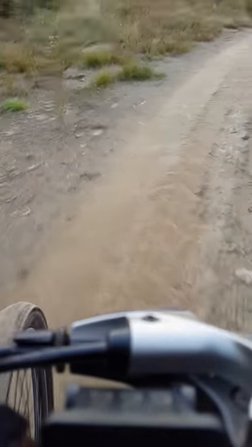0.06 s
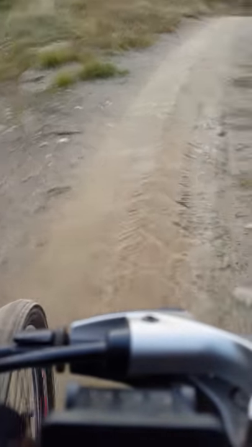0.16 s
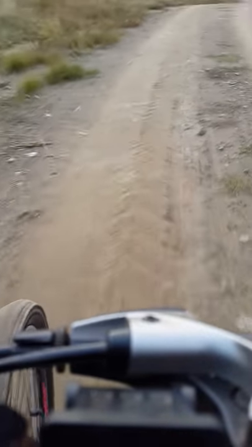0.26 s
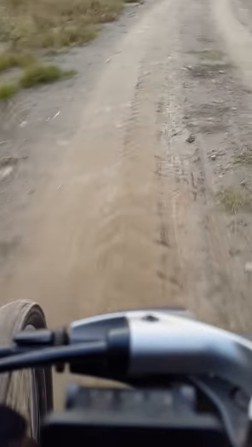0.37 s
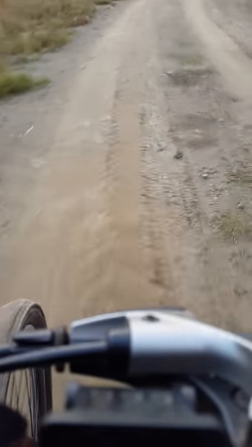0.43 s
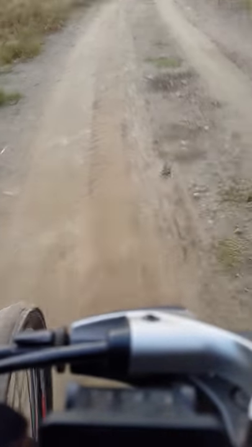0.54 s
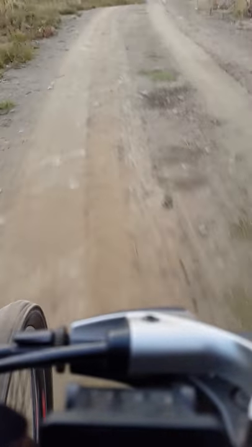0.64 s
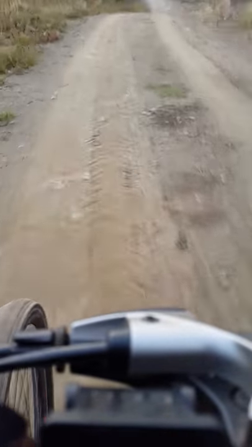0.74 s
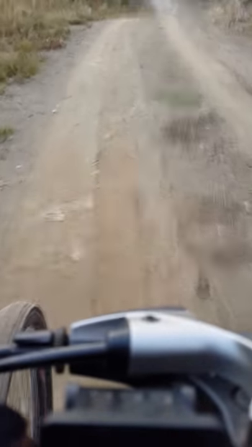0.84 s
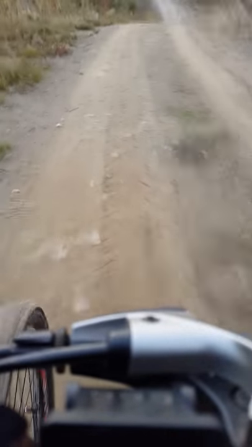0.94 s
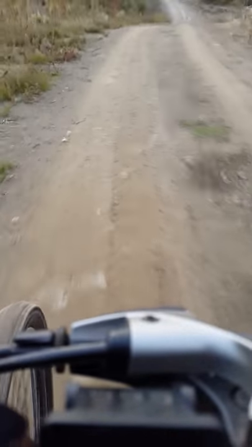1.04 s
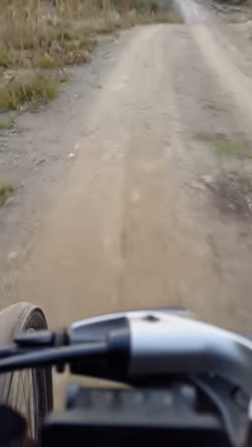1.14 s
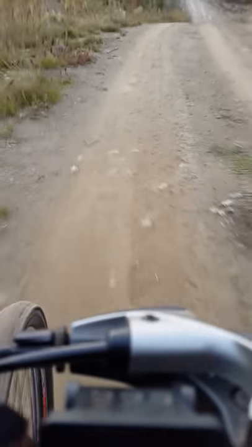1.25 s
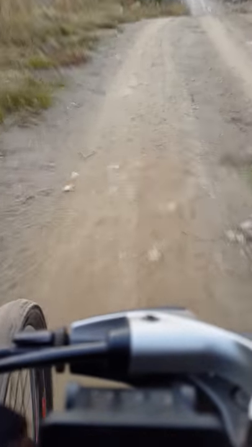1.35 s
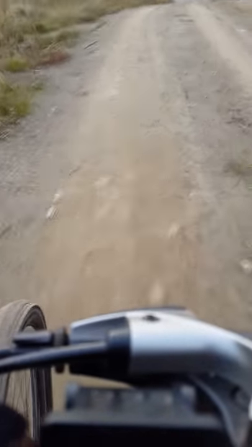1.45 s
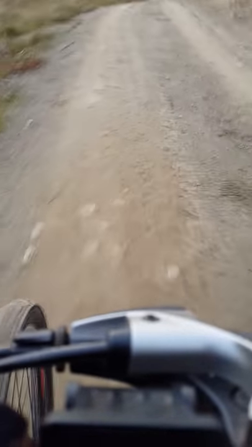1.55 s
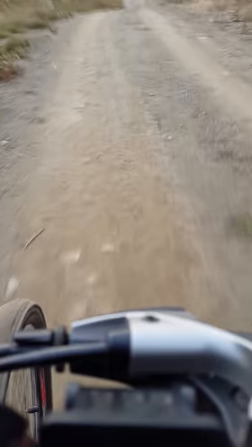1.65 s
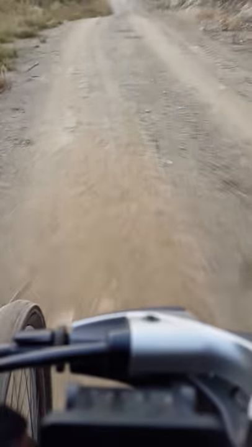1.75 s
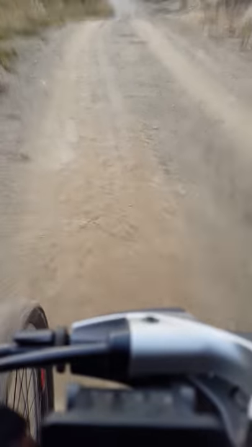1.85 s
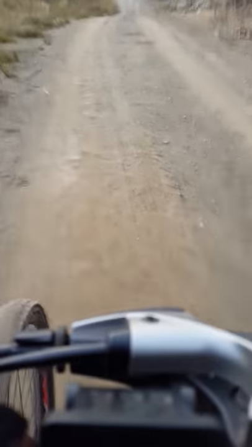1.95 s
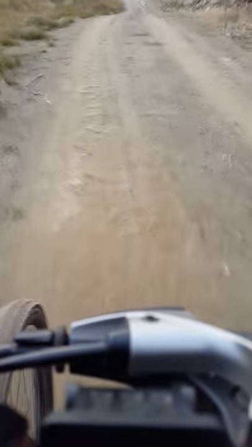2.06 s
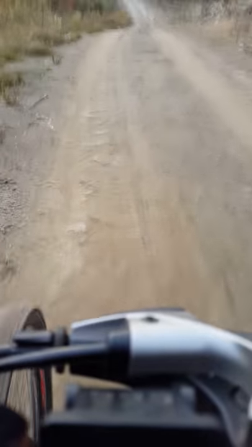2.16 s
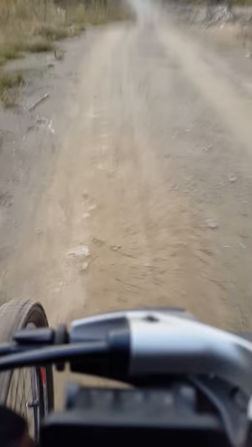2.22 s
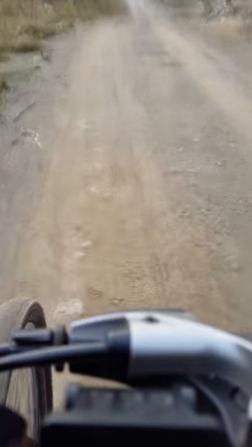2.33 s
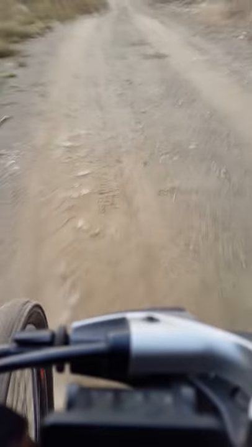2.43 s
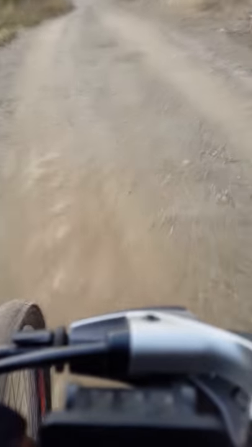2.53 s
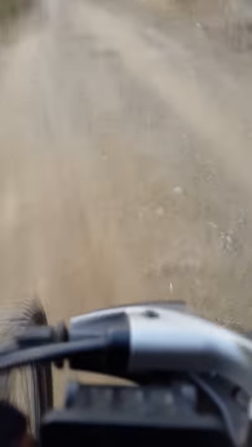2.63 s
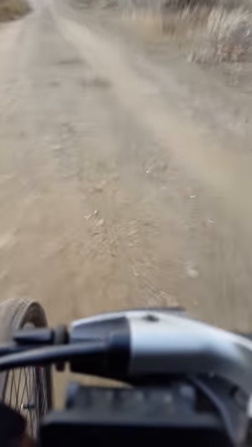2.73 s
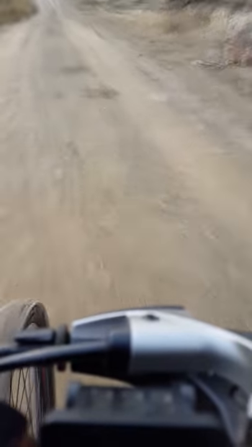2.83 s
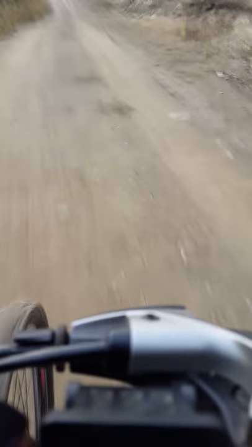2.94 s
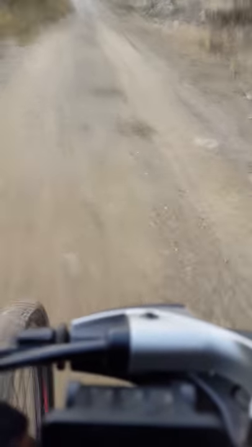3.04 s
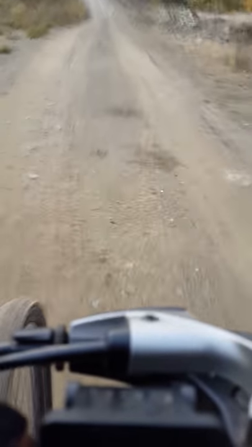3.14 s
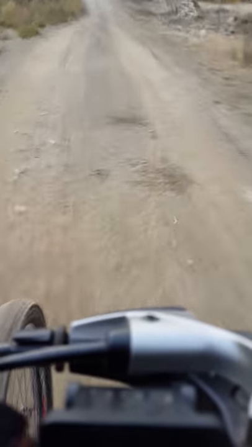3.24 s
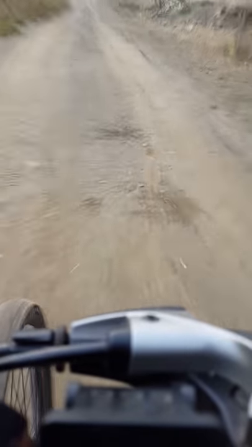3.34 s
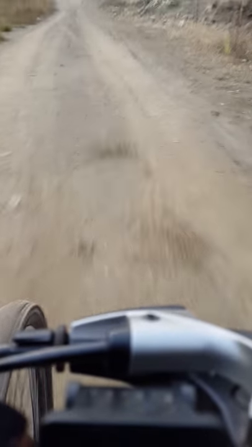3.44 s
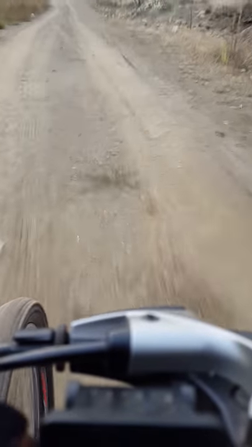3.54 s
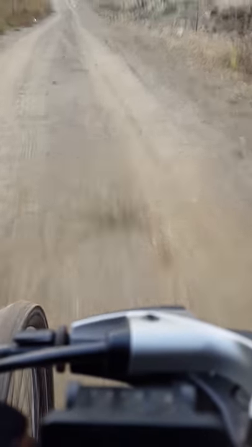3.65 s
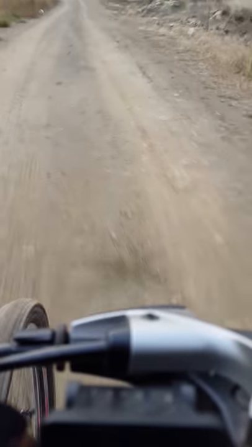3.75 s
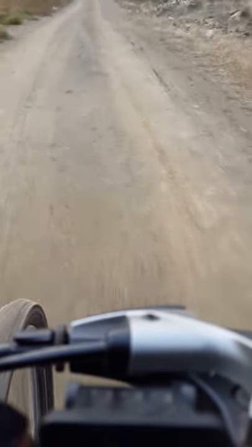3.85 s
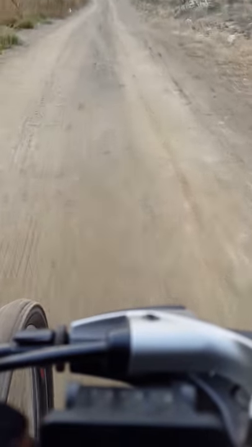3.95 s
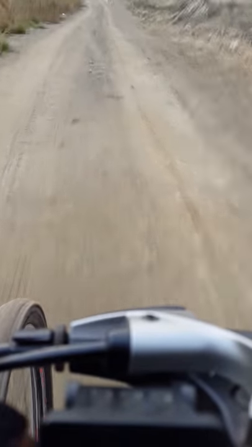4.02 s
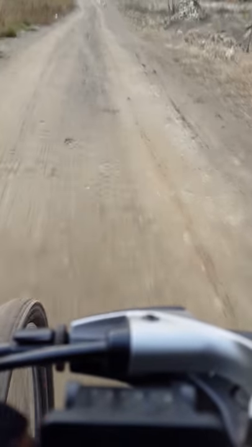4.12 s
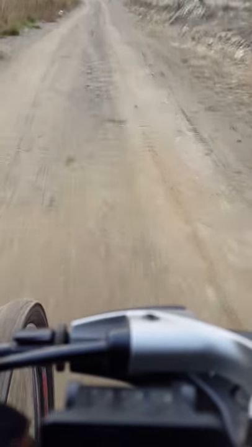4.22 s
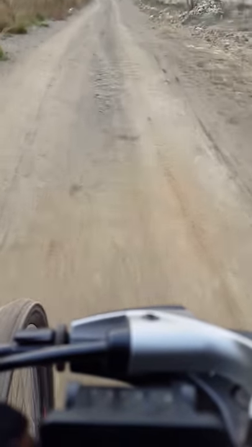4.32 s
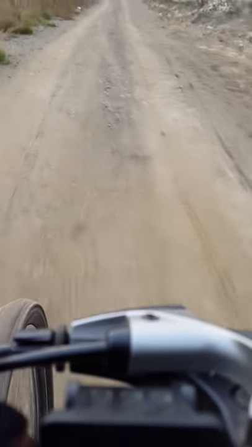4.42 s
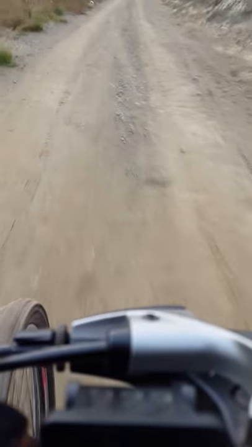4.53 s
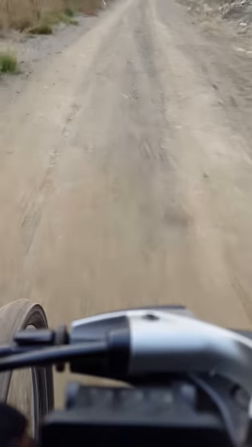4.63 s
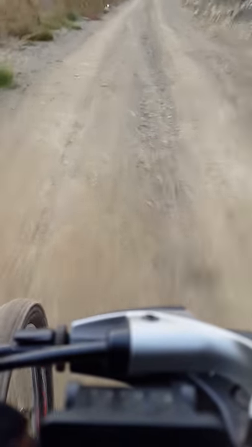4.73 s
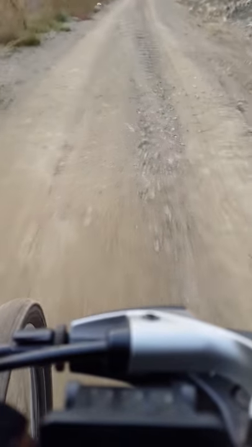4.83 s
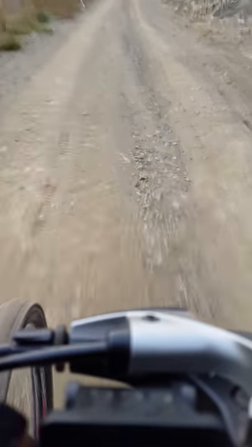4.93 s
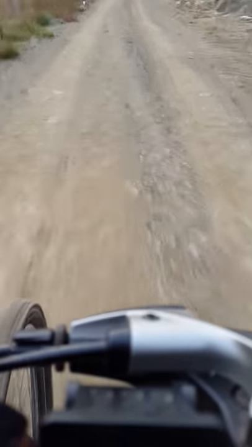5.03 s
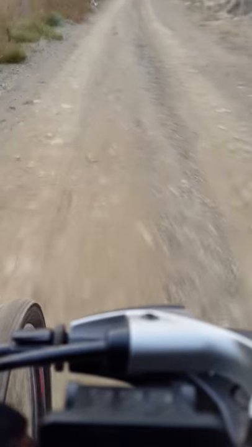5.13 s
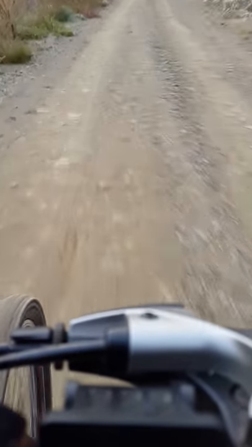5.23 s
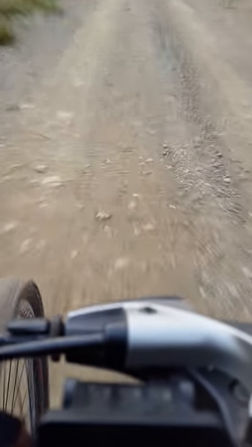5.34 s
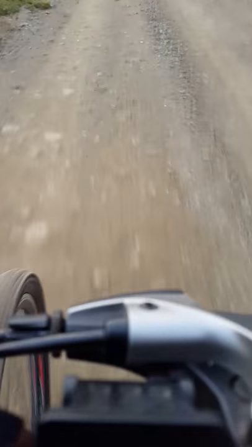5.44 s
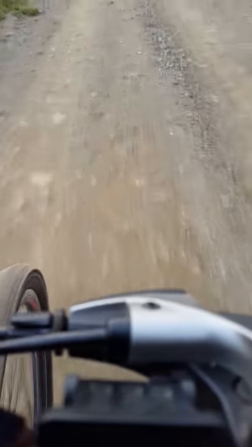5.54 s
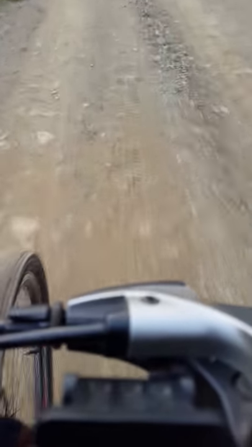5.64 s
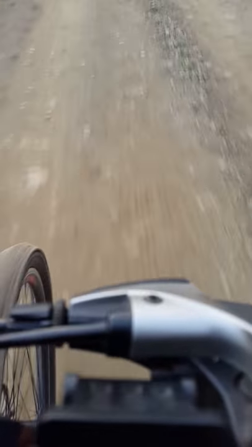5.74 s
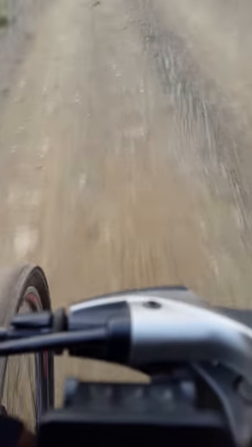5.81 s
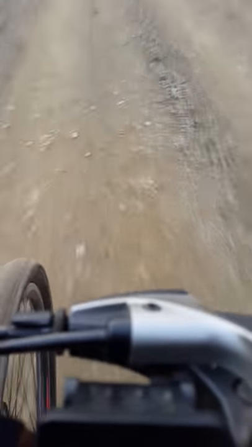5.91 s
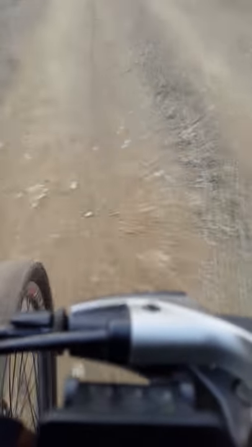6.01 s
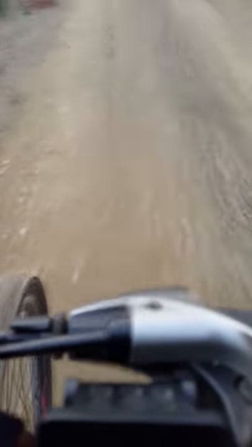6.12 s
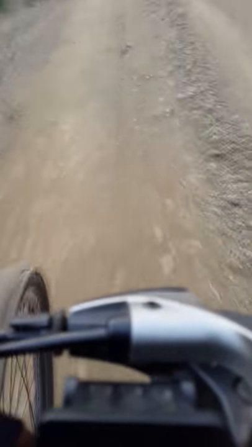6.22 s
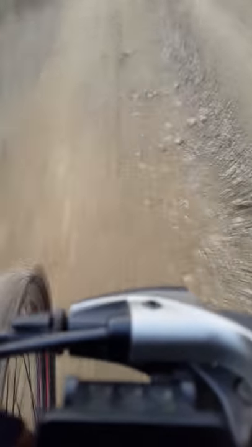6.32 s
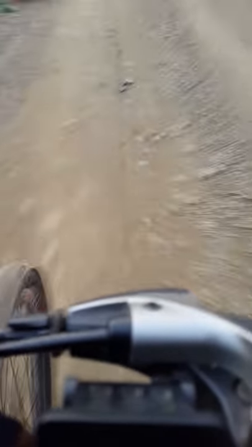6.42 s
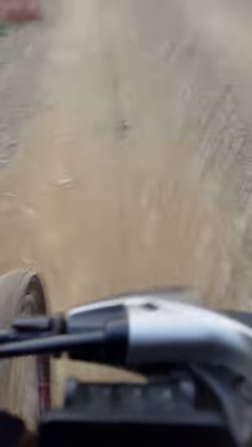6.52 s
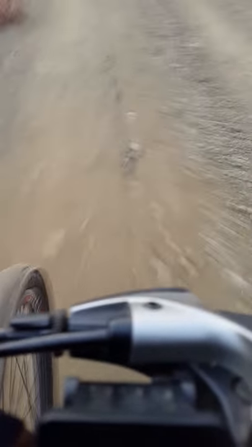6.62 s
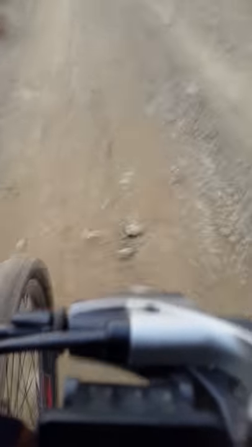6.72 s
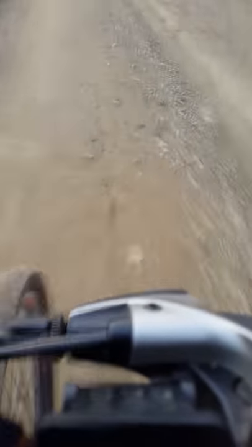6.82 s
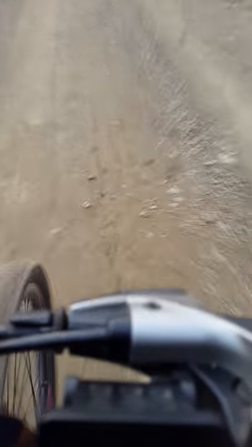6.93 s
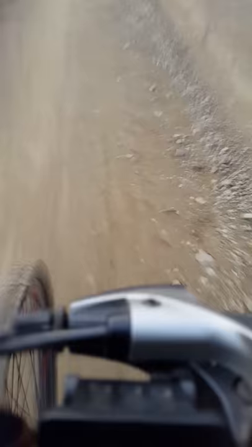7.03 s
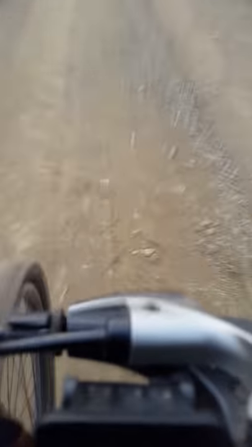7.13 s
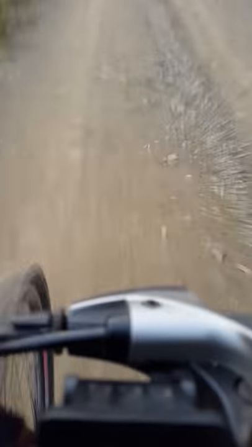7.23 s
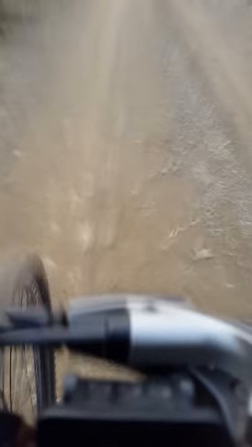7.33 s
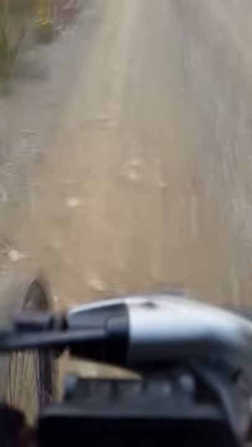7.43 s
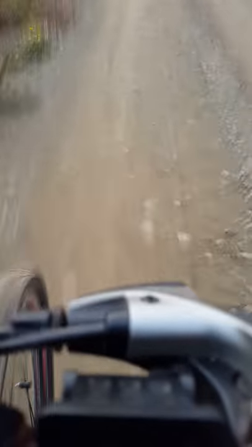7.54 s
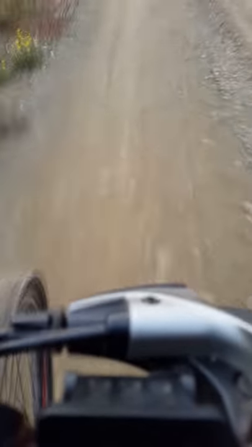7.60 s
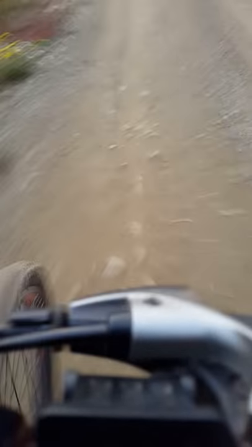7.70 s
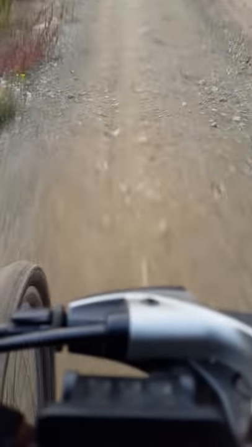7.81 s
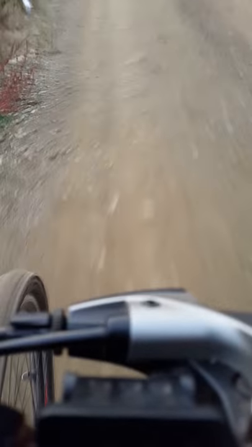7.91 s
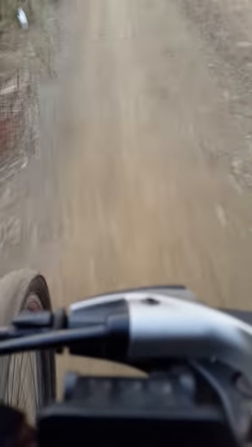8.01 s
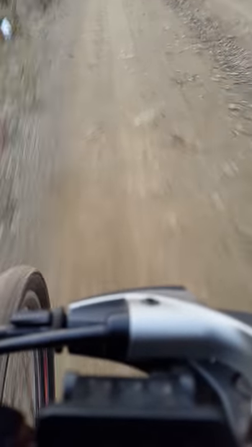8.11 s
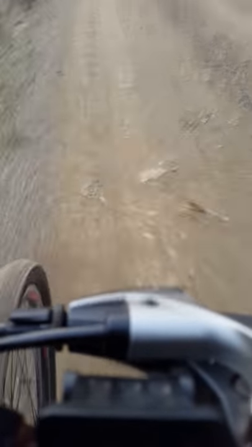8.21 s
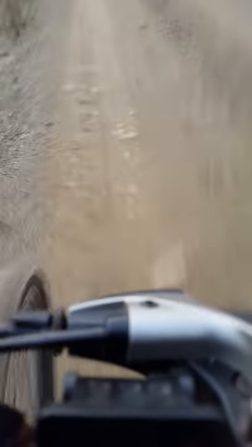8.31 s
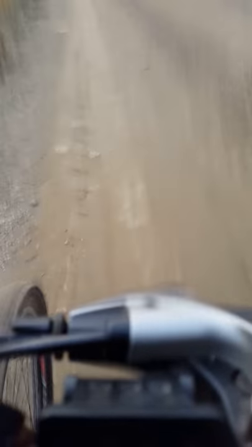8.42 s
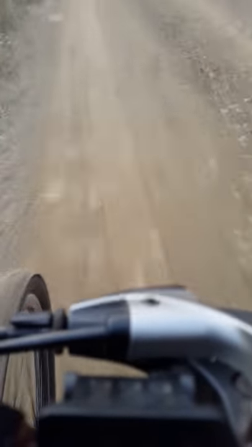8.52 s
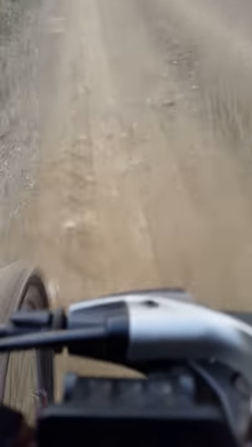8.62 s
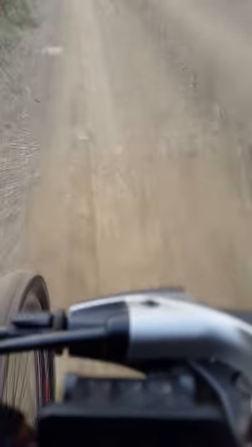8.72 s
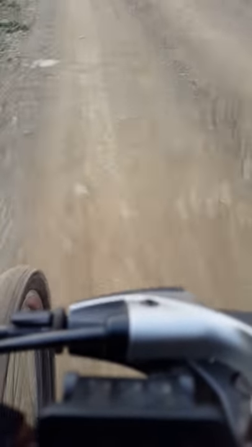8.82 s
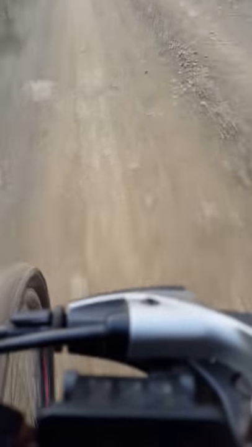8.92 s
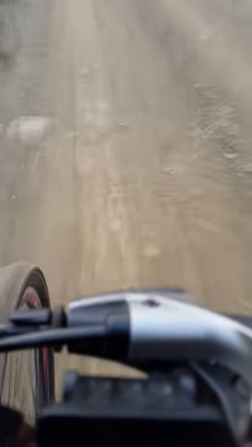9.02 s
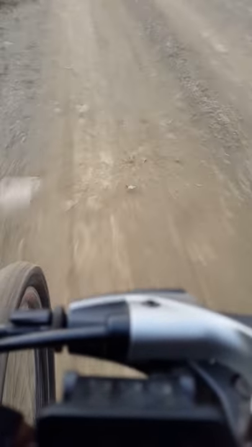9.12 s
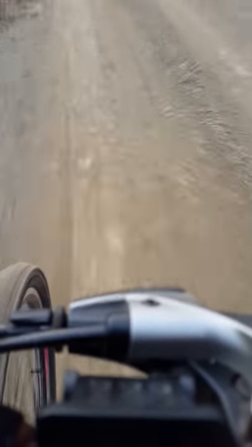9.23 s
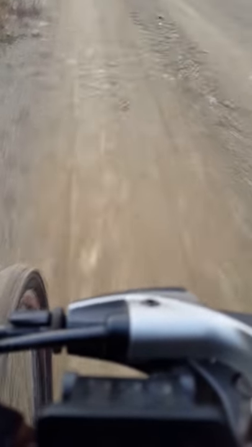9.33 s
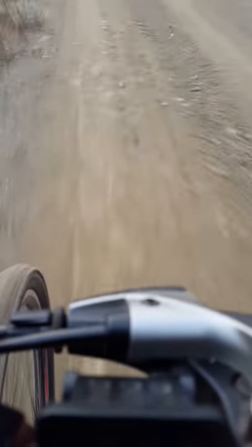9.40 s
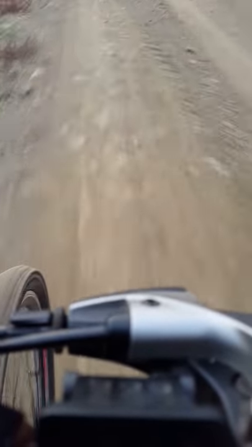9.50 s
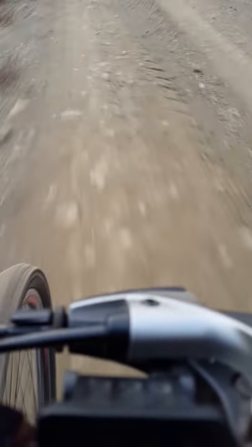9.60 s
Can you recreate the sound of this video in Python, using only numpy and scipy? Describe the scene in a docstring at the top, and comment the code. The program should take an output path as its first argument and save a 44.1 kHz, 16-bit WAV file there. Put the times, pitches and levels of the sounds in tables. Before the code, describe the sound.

A mountain bike rolls down a gritty track, its tyre rumble, knocks and cable clatter mixing with a growing, gusty wind roar.

```python
"""A puff of wind and a few light knocks, then a growing roar: a mountain bike gathers speed down a
dirt track, heard from its handlebar. Turbulent air buffets two microphone ports over the rumble of
the tyres, which crunch and hiss on grit. Bumps excite the damped modes of fork and frame, loose
cables and chain clack against their seats, and flung pebbles tick on the metal."""
import sys
import numpy as np
from scipy import signal
from scipy.fft import rfft, irfft
from scipy.io import wavfile
from scipy.ndimage import uniform_filter1d

SR = 44100
rng = np.random.default_rng(int(sys.argv[2]) if len(sys.argv) > 2 else 0)


def inscribe(sig):
    """Save sig as 16-bit PCM at rate SR to the path in sys.argv[1].

    A 1-D sig is mono; a 2-D sig holds one channel per row.
    Samples are clipped to [-1, 1] before scaling.
    """
    pcm = np.round(np.clip(np.atleast_2d(sig).T, -1, 1) * 32767)
    wavfile.write(sys.argv[1], SR, pcm.astype(np.int16))


N = 426006
TIME = np.arange(N) / SR
HIT_TIME = np.arange(5000) / SR  # seconds within one impact

# Levels are relative within each table; pan is left minus right.
# Low roar, growing with speed. Each row: time in seconds, level in dB.
ROAR_LEVEL = [(0, -55), (0.9, -44), (1.15, -29.5), (1.55, -25), (2.72, -23), (2.83, -28), (3.15, -34),
              (3.68, -36.5), (3.95, -27), (4.9, -22), (5.85, -24), (6.2, -17), (6.92, -17), (7.13, -24),
              (7.6, -28.5), (8.15, -27.5), (8.45, -29.5), (9.66, -18)]
# Tyre contact with the dirt. Each row: time in seconds, level in dB.
TYRE_LEVEL = [(0, -56.5), (0.18, -70.5), (0.85, -77), (1.06, -61.5), (1.35, -52), (1.64, -51),
              (2.68, -47.5), (2.85, -57.5), (3.1, -63), (3.62, -63.5), (4.22, -43), (6.2, -42.5),
              (6.9, -47), (7.15, -53.5), (7.7, -54.5), (8.12, -59), (8.58, -46), (9.02, -51.5),
              (9.35, -46.5), (9.66, -51)]
# Gravel on the track. Each row: time in seconds, looseness from 0 to 1.
LOOSENESS = [(1, 0.4), (3.6, 0.46), (4.3, 0.73), (5.2, 0.46), (6.6, 0.77), (7.3, 0.89)]
# Gusts of wind, and from 1.8 to 2.8 s low pulses, mostly on the right port, that come with the bumps. # Each
# row: start in seconds, length in seconds, level in dB, pan in dB.
GUSTS = [(0, 0.086, -33, -4.5), (0.295, 0.094, -38, -23), (1.16, 0.38, -37, -23),
         (1.505, 0.079, -24.5, -19), (1.78, 0.24, -27.5, -3.5), (2.062, 0.17, -24, 0.5),
         (2.282, 0.36, -29, -26), (2.64, 0.12, -23.5, -27), (3.87, 0.11, -28.5, 13), (4.14, 0.25, -29.5, 8),
         (4.55, 0.37, -27, 8), (4.92, 0.064, -25.5, 21), (5.122, 0.25, -27, -22), (5.442, 0.49, -21, 30),
         (6.35, 0.32, -21.5, -23), (8.346, 0.47, -26.5, 8), (8.759, 0.36, -20, 8.5),
         (9.17, 0.64, -20.5, 29)]
# Single sharp eddies. Each row: start in seconds, level in dB, pitch in Hz.
SLAPS = [(3.959, -22, 404), (4.794, -12, 384), (5.425, -13.5, 510), (5.459, -11, 260), (5.507, -7.5, 410),
         (5.559, -8.5, 520), (8.946, -14.5, 600), (9.055, -11, 356), (9.287, -8.5, 544), (9.336, -18, 815),
         (9.53, -13, 670), (9.612, -9.5, 436)]
# Blows on a wheel. Each row: start in seconds, frame knock in dB, fork thud in dB,
# knock pitch in Hz, knock pan in dB.
BUMPS = [(0.065, -38, -40, 434, 1), (0.193, -34.5, -39, 815, 1), (0.255, -32, -36, 510, 9),
         (0.501, -46, -33, 400, 5), (1.119, -15.5, -16, 434, 13), (1.5072, -19, -9.5, 730, 4),
         (1.9428, -19.5, -10, 625, 4), (2.105, -10, -8, 456, 6), (2.301, -18, -8, 292, 10),
         (2.466, -13, -5.5, 340, -8), (2.66, -9, -11, 465, 17), (2.687, -12.5, -9.5, 390, 15),
         (2.7359, -11.5, -5, 507, 14), (2.749, -12, -8, 330, -6), (2.949, -20, -17, 317, 13),
         (3.002, -26, -19, 493, 7), (3.238, -21.5, -20, 397, 4), (3.391, -28, -32, 400, 6),
         (3.455, -26, -25, 400, -1), (3.547, -27, -22, 330, 1), (4.645, -17, -15, 417, 20),
         (5.164, -10, -12, 395, 0), (5.22, -12, -24, 417, 7), (6.031, -15, -26, 556, -7),
         (6.067, -17, -29, 740, 7), (6.132, -16, -12.5, 300, -9), (6.538, -7.5, -12, 276, 8),
         (6.591, -12, -22, 433, 0), (6.865, -11.5, -8, 390, 16), (6.99, -11.5, -6.5, 493, 11),
         (7.208, -7, -7, 338, -1), (7.258, -14, -12.5, 310, -2), (7.295, -14, -12.5, 320, 6),
         (7.433, -13, -17, 312, -4), (7.479, -7.5, -19, 330, -4), (7.787, -19, -22, 298, 12),
         (8.466, -13, -17, 298, -9), (8.604, -16, -22, 308, -1)]
# Chain, levers and cables striking. Each row: start in seconds, level in dB, pan in dB,
# ring pitch in Hz, ring against crack in dB.
CLACKS = [(0.777, -51, 11, 2100, -2), (0.963, -41, 5, 2140, -11), (1.9465, -29, 6, 1330, -18),
          (2.266, -24.5, 18, 1630, -8), (2.4925, -22.5, -1, 1310, -15), (2.7385, -7.5, 11, 3700, -1),
          (2.7395, -11, 8, 2420, 0), (2.7524, -28, 7, 1390, -11), (2.774, -21, -1, 1880, -24),
          (2.786, -21.5, 11, 3400, -17), (2.8305, -30, -2, 2320, -13), (2.91, -34.5, 5, 1010, -9),
          (2.9512, -26, -2, 1690, -14), (3.5488, -36.5, 11, 1360, -3), (5.1625, -17, 4, 1000, -26),
          (5.221, -19, 4.5, 1330, -7), (5.247, -18, 6, 1000, -19), (5.9663, -15, 14, 3840, -16),
          (5.9835, -14.5, 7, 1530, -16), (6.0055, -13.5, 15, 2870, -30), (6.0164, -16, 4, 1410, -18),
          (6.0301, -10.5, -1, 1200, -14), (6.063, -18, -4, 990, -12), (6.0693, -7.5, 2, 1210, -10.5),
          (6.107, -15.5, 1, 1550, -11), (6.1325, -16, 0, 2410, -16), (6.2502, -17.5, 1, 2230, -21),
          (6.2668, -15.5, 15, 2370, -19), (6.31, -14.5, 9, 1820, -24), (6.4188, -19.5, 8, 3950, -27),
          (6.5934, -16, 2, 1550, -15), (6.607, -14.5, 0, 1200, -24), (6.6224, -19, 5, 1340, -15),
          (6.6412, -16, 0, 1920, -28), (6.6504, -15.5, 9, 1860, -34), (6.6742, -20, 14, 2600, -30),
          (6.8717, -14.5, 1, 1330, -21), (6.8896, -9.5, 8, 1590, -14), (6.992, -13, -1, 1270, -25),
          (7.0004, -19, 4, 1150, -26), (7.0059, -15, 13, 1800, -21), (7.0467, -22.5, 12, 1750, -37),
          (7.1884, -21.5, 15, 2920, -11), (7.208, -17.5, 10, 1570, -30), (7.224, -13, 8, 2020, -9),
          (7.2853, -24, 8, 1840, -20), (7.298, -24.5, 2, 1740, -27), (7.3099, -18.5, 12, 1230, -23),
          (7.442, -26, 10, 1200, -23), (7.456, -19, 1, 1870, -20), (7.4816, -19, 1, 2480, -11),
          (7.4908, -14, 7, 2000, -19), (7.4995, -12.5, 0, 1294, -28), (7.524, -19.5, 2, 1920, -18),
          (7.573, -25, 3, 1400, -10), (7.6595, -20.5, -1, 1990, -27), (7.674, -20, 1, 2000, -22),
          (7.7062, -21, 5, 1370, -9), (7.792, -25, 0, 2480, -18), (7.816, -21, 8, 1830, -15),
          (8.3718, -21.5, 9, 1590, -28), (8.588, -23.5, -14, 1480, -10)]
# Pebbles striking metal. Each row: start in seconds, level in dB, ring pitch in Hz.
PEBBLES = [(2.470, -18, 12400), (2.738, -8, 4950), (2.784, -12.5, 16000), (4.1228, -15.5, 11800),
           (5.6197, -8, 6200), (5.736, -9.5, 15100), (5.7817, -12.5, 5600), (5.806, -11, 5200),
           (5.82, -18, 9700), (5.855, -17, 8400), (5.861, -22, 12100), (5.968, -12, 10900),
           (6.8215, -19, 11200), (7.005, -15, 6500), (7.047, -19, 10900), (7.1886, -17.5, 12600),
           (7.371, -23, 10600), (7.4795, -28, 5950), (7.492, -11, 14500), (7.536, -17, 15200),
           (7.7074, -16.5, 10300), (7.984, -21, 10300), (8.127, -22, 11400), (8.372, -18.5, 5960),
           (8.8452, -23, 11900), (9.5595, -16, 10500), (9.5728, -15.5, 11400)]
# Stony stretches. Each row: start in seconds, length in seconds, chatter in dB, frame drumming in dB.
STONY_STRETCHES = [(0, 0.52, -68.5, -48.5), (2.885, 0.16, -80, -37), (5.16, 0.26, -43.5, -36.5),
                   (5.96, 0.16, -38, -30.5), (6.494, 0.35, -44, -26.5), (6.823, 0.21, -40.5, -29),
                   (7.193, 0.13, -42.5, -35), (7.436, 0.462, -51.5, -28), (7.882, 0.45, -74, -38.5),
                   (8.341, 0.25, -51, -27.5), (9.21, 0.62, -70, -32.5)]
# Stones snapping under the tread. Each row: start in seconds, level in dB.
SNAPS = [(1.5085, -28.5), (2.098, -24), (2.126, -29), (2.218, -26.5), (2.551, -28), (4.457, -37),
         (4.664, -22), (4.9084, -19)]
# Patches of gravel. Each row: start in seconds, length in seconds, level in dB.
RASPS = [(0.2, 0.09, -54), (0.597, 0.24, -72), (0.918, 0.1, -63), (1.575, 0.024, -43), (1.627, 0.023, -41),
         (1.707, 0.022, -44), (2.205, 0.04, -43), (2.254, 0.039, -43.5), (5.15, 0.034, -31),
         (5.236, 0.054, -34), (5.344, 0.041, -35.5), (6.062, 0.025, -36), (6.852, 0.029, -43),
         (7.486, 0.017, -40), (8.596, 0.028, -49), (9.17, 0.037, -36.5), (9.605, 0.043, -39)]
# Slides on sand. Each row: centre in seconds, half length in seconds, swish in dB, spray in dB.
SCUFFS = [(0.341, 0.089, -46.5, -64), (3.246, 0.08, -45.5, -64), (4.28, 0.096, -43, -36)]

# Spectra at the ports. Each row: frequency in Hz, left gain in dB, right gain in dB.
WIND_SPECTRUM = [(20, -13, -32), (45.8, -8.5, -14), (70.8, -2, 7), (109, 1.5, 3.5), (188, -2.5, -4.5),
                 (231, -7, -19.5), (320, -10.5, -14.5), (434, -29.5, -26), (935, -40, -32.5),
                 (3000, -69, -82)]  # large eddies
EDDY_SPECTRUM = [(115, -10.5, -23.5), (231.5, 3, 28.5), (355, 0.5, 3.5), (510, -5.5, -16),
                 (653, -12.5, -11), (1165, -23, -7), (2400, -38, -19), (6000, -82, -103)]  # small eddies
RUMBLE_SPECTRUM = [(25, -9, -25), (58.5, -18.5, -12.5), (77.5, 4, 1), (109.7, -4, -3), (161.3, 7, 6),
                   (224, -7, -5), (318, -13.5, -16.5), (378, -12.5, -22.5), (487, -13, -21),
                   (586, -25.5, -27.5), (775, -31.5, -31.5), (2100, -86, -76.5)]  # rolling wheels
FRAME_SPECTRUM = [(113, -37, 0), (219.5, 6.5, 1.5), (328, 1, 16.5), (506, -5, -10.5), (580, -14.5, -17.5),
                  (685, -11, -12), (984, -29, -8.5), (1270, -21.5, -28), (2360, -35.5, -42),
                  (6100, -99, -62)]  # struck frame
CLATTER_SPECTRUM = [(204, -55, -17), (555, 11.5, 19), (950, 8, 1.5), (1330, 1, 5.5), (1890, 6.5, 2.5),
                    (2860, 4.5, -7.5), (4430, 3, -14.5), (4770, 0, -16), (7570, -12, -30), (8900, -19, -79),
                    (11500, -17, -33), (16000, -21, -54)]  # loose parts
CRUNCH_SPECTRUM = [(400, -22, -20), (985, 9, 6), (1150, -5, -57), (1710, 6.5, -5.5), (2120, 3, -15),
                   (2940, 6, -12), (4640, 4.5, -13.5), (4970, 1, -13.5), (6100, 1.5, -21), (6640, -8, -25),
                   (8040, -18.5, -45), (9400, -62, -52), (16000, -78, -47)]  # crushed grit
HISS_SPECTRUM = [(2980, -17, -30), (5600, 10.5, -32), (7930, 6.5, -15), (8700, 1.5, -28), (9800, 9.5, -16),
                 (12800, 10.5, -0.5), (14500, 5, -0.5), (16700, 13, -15)]  # fine sand and air
SWISH_SPECTRUM = [(674, 15, -12), (1300, -2.5, -8), (2600, 5, -15), (3600, 7.5, -17), (4500, 2.5, -14),
                  (5560, 6, -15), (6740, -15, -28), (7800, -16, -31), (9300, -50, -40), (11300, -26, -20),
                  (13500, -21, -6), (15800, -12, -13)]  # sliding tyre

# Normal modes. Each row: frequency in Hz, level in dB, time to decay by 60 dB in seconds.
FORK_MODES = [(87.6, -12.5, 0.13), (126.4, -9.5, 0.068), (150, -18.5, 0.057), (229, -9, 0.022)]
TUBE_MODES = [(302, 8, 0.017), (325, 3.5, 0.05), (457, -24, 0.035), (455, -8, 0.017), (600, -17, 0.078),
              (730, -6, 0.043), (914, -5.5, 0.027)]
LOOSE_PART_MODES = [(1180, -4, 0.025), (1500, -3, 0.027), (1916, -19, 0.042), (2550, 0.5, 0.013),
                    (3480, -7, 0.017), (4390, -8, 0.027), (6540, 11, 0.0049)]


def wind_and_rumble(rumble_db=-4.5, steady_db=-6, eddy_db=2, jolt_db=2.5, lump_hz=22, swell_db=1.1):
    """Turbulent pressure varies independently at each port, over the rumble of the rolling wheels."""
    roar_db, = curves(ROAR_LEVEL)
    drift = sides(np.linspace(-3, 4, N))  # the airflow swings slowly from right to left
    steady = amp(roar_db + swell_db * wander(hz=12)) * drift
    gusts = sum(amp(db) * sides(pan_db) * plateau(s, length, edge_s=0.033)
                for s, length, db, pan_db in GUSTS)
    eddies = colour(noise() * amp(eddy_db * wander(lump_hz, channels=2)), WIND_SPECTRUM)
    rumble = colour(noise() * amp(jolt_db * wander(lump_hz)), RUMBLE_SPECTRUM)
    buffeting = balanced(eddies) * np.hypot(amp(steady_db) * steady, gusts)
    return buffeting + balanced(rumble) * amp(rumble_db) * steady + flutter(gusts)


def flutter(gusts, gain_db=-24, strong_db=-16, growth=0.98, pan_db=5, lump_db=7, lump_hz=55):
    """Eddy shedding: the harder a gust blows, the stronger its small eddies."""
    eddies = colour(noise() * amp(lump_db * wander(lump_hz, channels=2)), EDDY_SPECTRUM)
    return balanced(eddies) * amp(gain_db) * (gusts / amp(strong_db)) ** growth * sides(pan_db)


def slaps(pan_db=22, puff_db=-4, snap_db=-17):
    """A pressure pulse: one eddy bursts on the left port with a hollow pock, a puff and a faint snap."""
    out = np.zeros((2, N))
    for s, db, hz in SLAPS:
        pock = unit_peak(HIT_TIME * ping(hz, decay_s=0.0013))
        puff = amp(puff_db) * coloured_crack(EDDY_SPECTRUM, decay_s=0.0042)
        snap = amp(snap_db) * coloured_crack(FRAME_SPECTRUM, decay_s=0.0014)
        add(out, s, (pock + puff + snap) * amp(db) * sides(pan_db))
    return out


def bumps(knock_db=-1, ring_s=0.0048, rise_s=0.00055, tubes_db=-3, crack_db=-11, thud_db=3):
    """Impact excitation: the fork thuds and the frame knocks, at a pitch set by where the blow lands."""
    out = np.zeros((2, N))
    envelope = np.exp(-HIT_TIME / ring_s) * (1 - np.exp(-HIT_TIME / rise_s))
    for s, db, fork_db, hz, pan_db in BUMPS:
        hollow = np.sin(2 * np.pi * hz * HIT_TIME) * envelope
        tubes = amp(tubes_db) * ring(TUBE_MODES, detune=0.019, uneven_db=-4.5)
        contact = amp(crack_db) * coloured_crack(FRAME_SPECTRUM, decay_s=0.0023)
        add(out, s, amp(db + knock_db) * sides(pan_db) * (hollow + tubes + contact))
        thud = ring(FORK_MODES, detune=0.079, uneven_db=-5)
        add(out, s, amp(fork_db + thud_db) * sides(pan_db=-3) * thud)
    return high_pass(out, hz=65, order=3)  # trims the deepest bass from each thud


def clacks(gain_db=2, judder=0.015, judder_s=0.015, lead_s=0.012, crack_s=0.0018, uneven_db=2,
           rebound=0.67, rebound_s=0.0029):
    """Intermittent contact: a loose part judders, slaps home, rings with its neighbours and rebounds."""
    out = np.zeros((2, N))
    judder_envelope = judder * np.exp(-abs(HIT_TIME - lead_s) / judder_s)
    for s, db, pan_db, hz, ring_db in CLACKS:
        contact = noise(len(HIT_TIME)) * judder_envelope
        own_ring = amp(ring_db) * ping(hz, decay_s=0.0017)  # damped by plastic and rubber
        neighbours = 0.08 * ring(LOOSE_PART_MODES, detune=0.021, uneven_db=33)
        strike = crack(crack_s * amp(uneven_db * rng.standard_normal()))
        add(contact, lead_s, strike + own_ring + neighbours)
        add(contact, lead_s + rebound_s * (0.5 + rng.random()), rebound * rng.random() * crack(crack_s))
        contact = high_pass(contact, 0.29 * hz, order=2)  # a small, high-pitched part has little body
        clack = unit_peak(colour(contact, CLATTER_SPECTRUM))
        add(out, s - lead_s, clack * amp(db + gain_db) * sides(pan_db))
    return out


def pebbles(gain_db=1.5, pan_db=13, body_db=-11, skid=0.26, bounce=0.39, bounce_s=0.0026):
    """Brief contact excites high modes: pebbles flung up on the left tick on metal, skid and bounce."""
    out = np.zeros((2, N))
    for s, db, hz in PEBBLES:
        contact = crack(decay_s=0.00019) + skid * crack(decay_s=0.0025)
        add(contact, bounce_s * (0.5 + rng.random()), bounce * contact)
        ringing = 1150 / hz * ping(hz, decay_s=0.0028)  # a larger, lower part rings more strongly
        tick = unit_peak(high_pass(contact, hz=4000, order=1) + ringing)
        body = amp(body_db) * coloured_crack(CLATTER_SPECTRUM, decay_s=0.00083)
        add(out, s, (tick + body) * amp(db + gain_db) * sides(pan_db))
    return out


def frame_drumming(gain_db=-12, stones_db=-3.5, jolt_db=2, jolt_hz=40):
    """Structure-borne sound: small stones under the tyres drum through the frame in jolts."""
    roar_db, = curves(ROAR_LEVEL)
    _, stony_drumming = stony_gains()
    blows = impacts(per_s=1500, spread_db=6, cap=3.86) * amp(jolt_db * wander(jolt_hz))
    steady = amp(roar_db + gain_db) * sides(pan_db=8)
    stony = stony_drumming * amp(stones_db) * sides(pan_db=4)
    return balanced(colour(blows, FRAME_SPECTRUM)) * np.hypot(steady, stony)


def tyres(crunch_db=-0.5, hiss_db=-61, cruise_db=-50, hiss_growth=1.6, loose_db=9, grit=0.46, sand=0.95):
    """Many tiny impacts merge into noise: grit crunches, and sand spurts over the hiss of rushing air."""
    tyre_db, = curves(TYRE_LEVEL)
    looseness, = curves(LOOSENESS)
    # the hiss grows faster with speed than the crunch, and is louder and more fitful on loose ground
    hiss_level_db = hiss_db + hiss_growth * (tyre_db - cruise_db) + loose_db * looseness
    flicker_db = 1.7 * wander(hz=140)
    spurts_db = (3.5 * wander(hz=45) + 3.04 * wander(hz=14)) * looseness
    crunch = noise() + grit * looseness * impacts(per_s=1500, spread_db=6)
    hiss = noise() + sand * looseness * impacts(per_s=340, spread_db=4.5)
    crunch = unit_rms(patchy(colour(crunch, CRUNCH_SPECTRUM)))
    hiss = unit_rms(patchy(colour(hiss, HISS_SPECTRUM)))
    return (crunch * amp(tyre_db + crunch_db + flicker_db + 0.21 * spurts_db)
            + hiss * amp(hiss_level_db + flicker_db + spurts_db))


def chatter(per_s=260, light_db=-7, stones_db=1, pan_db=1, ringing=0.47):
    """Forced rattling: chain and cables tap the frame, lightly while rolling and hard over stones."""
    tyre_db, = curves(TYRE_LEVEL)
    looseness, = curves(LOOSENESS)
    stony_chatter, _ = stony_gains()
    out = np.zeros((2, N))
    for hz, db, t60 in LOOSE_PART_MODES:
        taps = impacts(per_s / len(LOOSE_PART_MODES), spread_db=5.5, cap=3)[:1]
        tap = crack(decay_s=0.005) + ringing * amp(db) * ring([(hz, db, t60)], detune=0.019, uneven_db=0)
        out += signal.oaconvolve(taps, tap, axes=1)[:, :N]
    shake = np.hypot(amp(tyre_db + light_db) * looseness, stony_chatter * amp(stones_db))
    return unit_rms(colour(out, CLATTER_SPECTRUM)) * shake * sides(pan_db)


def rasps(gain_db=0.5, pan_db=2, grit=0.89):
    """Friction: many stones grind at once under the tread and shake the loose parts."""
    level = sum(amp(db) * plateau(s, length, edge_s=length / 2) for s, length, db in RASPS)
    grinding = noise() + grit * impacts(per_s=900, spread_db=7.5)
    return unit_rms(colour(grinding, CLATTER_SPECTRUM)) * level * amp(gain_db) * sides(pan_db)


def stone_pops(gain_db=-12.5, snap_db=1):
    """Brittle fracture: small stones keep cracking under the tread, and at times a larger one snaps."""
    tyre_db, = curves(TYRE_LEVEL)
    fractures = impacts(per_s=36, spread_db=6, cap=3.4)
    cracks = signal.oaconvolve(fractures, crack(decay_s=0.0003), axes=1)[:, :N]
    out = unit_rms(colour(cracks, CRUNCH_SPECTRUM)) * amp(tyre_db + gain_db)
    for s, db in SNAPS:
        snap = colour(crack(decay_s=0.0041), CRUNCH_SPECTRUM)
        add(out, s, snap / abs(snap).max() * amp(db + snap_db))
    return out


def scuffs():
    """Sliding friction: a tyre slips on soft ground with a smooth swell of hiss and a spray of sand."""
    swish, spray = np.zeros((2, N))
    for s, half_s, swish_db, spray_db in SCUFFS:
        swell = np.exp(-((TIME - s) / half_s) ** 2)
        swish += amp(swish_db) * swell
        spray += amp(spray_db) * swell
    sand = colour(impacts(per_s=1100, spread_db=5.5), HISS_SPECTRUM)
    return unit_rms(colour(noise(), SWISH_SPECTRUM)) * swish + unit_rms(sand) * spray


def reflected(x, echo_db=-17, longest_s=0.012, count=8):
    """Early reflections from ground, wheels and rider reach each port with different delays."""
    out = x.copy()
    for port in range(2):
        delays = rng.uniform(0.11, 1, count) * longest_s
        for delay, sign in zip(delays, rng.choice([-1, 1], count)):
            add(out[port:port + 1], delay, sign * amp(echo_db) / np.sqrt(count) * x[port:port + 1])
    return out


def ring(modes, detune, uneven_db):
    """Modal response to one blow; the point of impact shifts each mode's pitch and strength."""
    hz, db, t60 = np.transpose(modes)[:, :, None]
    shift, left, right = rng.standard_normal((3, len(modes), 1))
    sign = rng.choice([-1, 1], (2, len(modes), 1))
    waves = amp(db - 60 * HIT_TIME / t60) * np.sin(2 * np.pi * hz * (1 + detune * shift) * HIT_TIME)
    return unit_peak((sign * amp(uneven_db * np.array([left, right])) * waves).sum(1))


def ping(hz, decay_s):
    """One damped mode, with a different phase at each port."""
    return np.sin(2 * np.pi * (hz * HIT_TIME + rng.random((2, 1)))) * np.exp(-HIT_TIME / decay_s)


def crack(decay_s):
    """Contact noise with exponential decay."""
    return unit_peak(noise(len(HIT_TIME)) * np.exp(-HIT_TIME / decay_s))


def coloured_crack(spectrum, decay_s):
    """A filtered noise burst of peak 1."""
    return unit_peak(colour(crack(decay_s), spectrum))


def impacts(per_s, spread_db, cap=4.5):
    """A Poisson train of impulses at each port: many small, a few large."""
    size = amp(spread_db * np.minimum(rng.exponential(1, (2, N)), cap))
    return unit_rms(size * rng.choice([-1, 1], (2, N)) * (rng.random((2, N)) < per_s / SR))


def noise(samples=N):
    """White noise, independent at each port."""
    return rng.standard_normal((2, samples))


def wander(hz, channels=1):
    """Smooth, bounded random modulation of unit size, up to about hz."""
    f = np.fft.rfftfreq(N, 1 / SR)
    x = irfft(rfft(rng.standard_normal((channels, N))) * np.exp(-(f / hz) ** 2), N)
    x = np.tanh(x / x.std())
    return x / x.std()


def patchy(x, depth_db=2, size=256):
    """Spectral modulation: narrow bands flare and fade as one stone follows another."""
    spectra = signal.stft(x, nperseg=size)[2]
    patches = uniform_filter1d(rng.standard_normal(spectra.shape), size=4, axis=1)  # across frequency
    patches = uniform_filter1d(patches, size=12, axis=2)  # across time
    return signal.istft(spectra * amp(depth_db * patches / patches.std()), nperseg=size)[1][:, :N]


def colour(x, spectrum, size=4096):
    """Minimum-phase filter with one response for each port."""
    hz, *ports = np.transpose(spectrum)
    f = abs(np.fft.fftfreq(size, 1 / SR))
    log_gain = np.log(amp([np.interp(np.log(f + 1), np.log(hz), db) for db in ports]))
    taps = np.fft.ifft(np.exp(np.conj(signal.hilbert(log_gain)))).real
    return signal.oaconvolve(x, taps[:, :size // 2], axes=1)[:, :x.shape[1]]


def high_pass(x, hz, order):
    """Attenuates frequencies below hz."""
    return signal.sosfilt(signal.butter(order, hz, "high", fs=SR, output="sos"), x)


def stony_gains():
    """Envelopes of the chatter and the drumming that stony stretches add."""
    return sum(amp([[chatter_db], [drum_db]]) * plateau(s, length, edge_s=0.01)
               for s, length, chatter_db, drum_db in STONY_STRETCHES)


def plateau(start_s, length_s, edge_s):
    """Trapezoidal envelope between 0 and 1."""
    return np.clip(np.minimum(TIME - start_s, start_s + length_s - TIME) / edge_s + 0.5, 0, 1)


def curves(rows):
    """Linear interpolation of each column over time."""
    s, *columns = np.transpose(rows)
    return [np.interp(TIME, s, column) for column in columns]


def sides(pan_db):
    """Constant-power panning: two gains, pan_db apart."""
    gains = np.array([amp(pan_db / 2), amp(-pan_db / 2)]).reshape(2, -1)
    return gains / np.sqrt(np.mean(gains ** 2, 0))


def amp(db):
    """Decibels to gain."""
    return 10 ** (np.asarray(db) / 20)


def unit_rms(x):
    """Scales a stereo pair so that its average has rms 1."""
    return x / np.sqrt(np.mean(x.mean(0) ** 2) + 1e-20)


def unit_peak(x):
    """Scales each channel to a peak of 1."""
    return x / (abs(x).max(-1, keepdims=True) + 1e-12)


def balanced(x):
    """Gives both ports equal power, and their average rms 1."""
    return unit_rms(x / x.std(1, keepdims=True))


def add(mix, s, sound):
    """Superposes a sound at s seconds."""
    part = mix[:, max(round(s * SR), 0):][:, :sound.shape[1]]
    part += sound[:, :part.shape[1]]


def scene():
    """Superposition of all sources at the two ports."""
    rolling = reflected(frame_drumming() + tyres() + scuffs() + rasps() + chatter())
    return wind_and_rumble() + slaps() + rolling + bumps() + clacks() + pebbles() + stone_pops()


def record(dry, low_cut_hz=30, dip_hz=9700, dip_width_hz=850, dip_db=-7, high_cut_hz=16050):
    """Filtering and saturation: deep bass is cut, the treble dips near 9.7 kHz, peaks are rounded."""
    f = np.fft.rfftfreq(N, 1 / SR)
    dip = amp(dip_db * np.exp(-((f - dip_hz) / dip_width_hz) ** 2))
    x = high_pass(irfft(rfft(dry) * dip, N), low_cut_hz, order=2)
    rounded = x / (1 + (x / 0.95) ** 6) ** (1 / 6)
    low_pass = signal.firwin(401, high_cut_hz, window=("kaiser", 8), fs=SR)
    return signal.oaconvolve(rounded, low_pass[None], "same")


dry = scene()
out = record(dry)
inscribe(out)
```